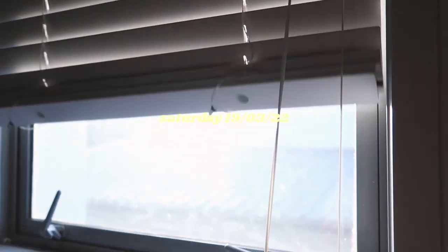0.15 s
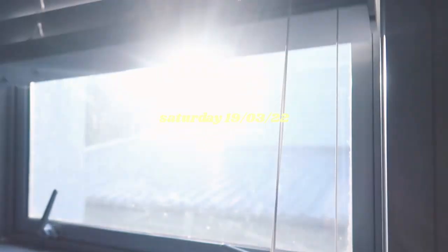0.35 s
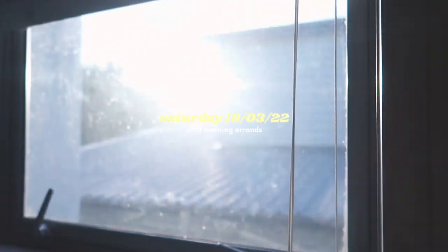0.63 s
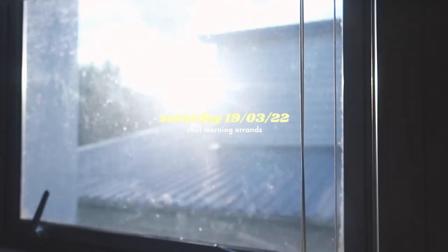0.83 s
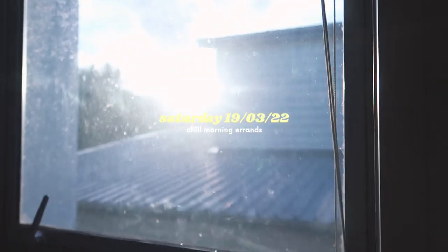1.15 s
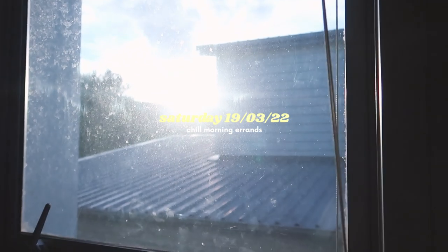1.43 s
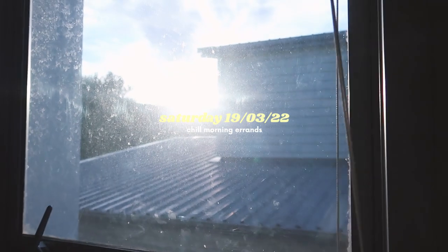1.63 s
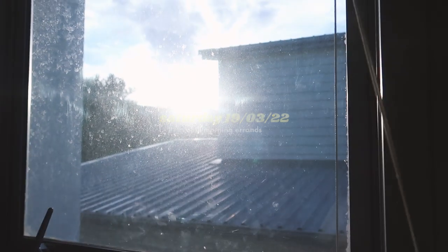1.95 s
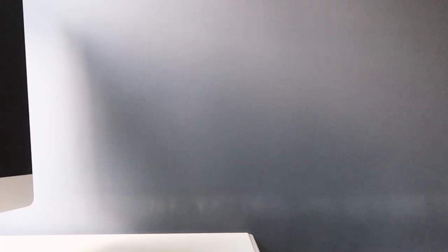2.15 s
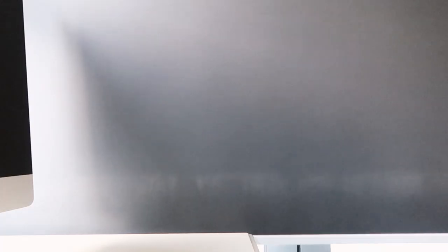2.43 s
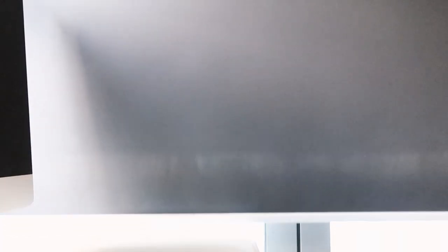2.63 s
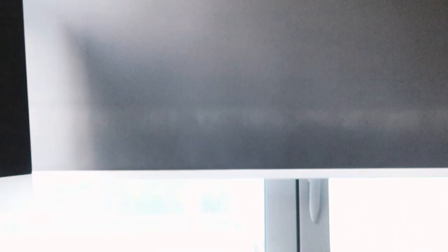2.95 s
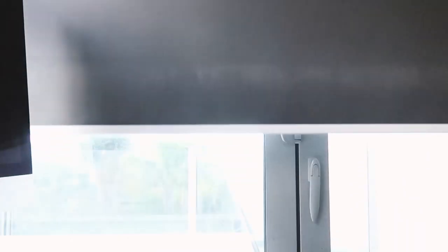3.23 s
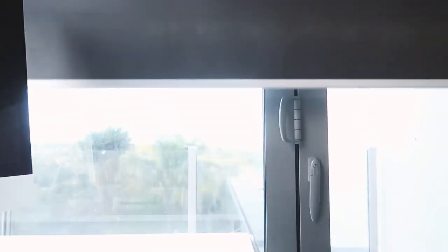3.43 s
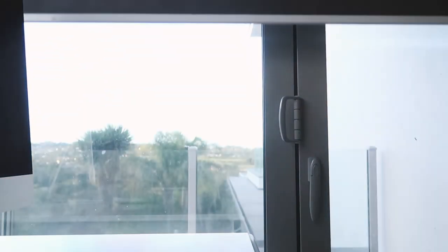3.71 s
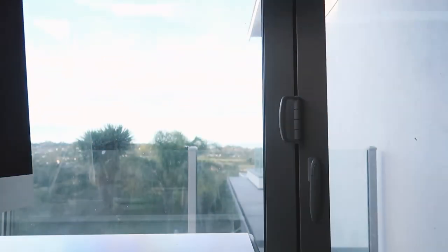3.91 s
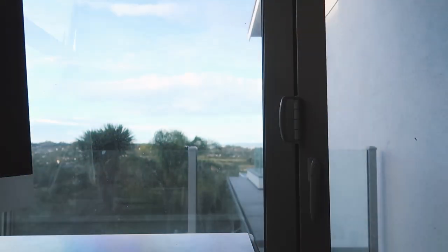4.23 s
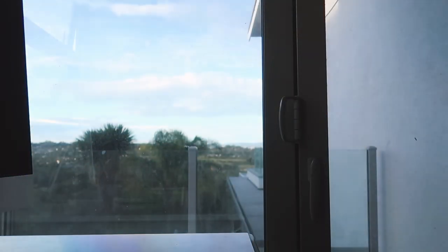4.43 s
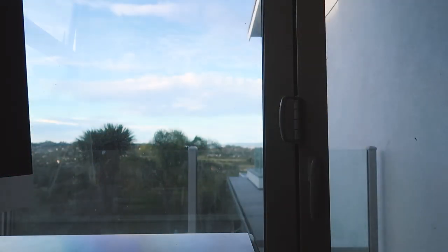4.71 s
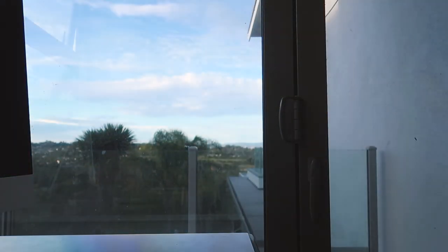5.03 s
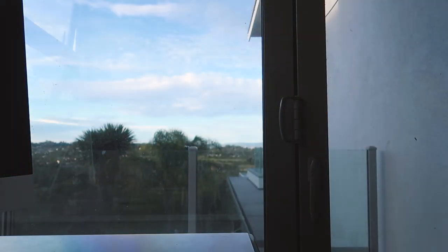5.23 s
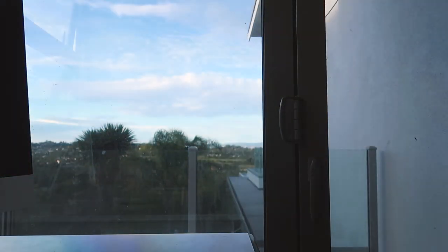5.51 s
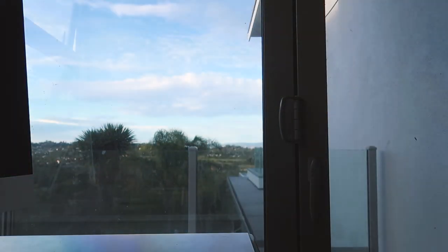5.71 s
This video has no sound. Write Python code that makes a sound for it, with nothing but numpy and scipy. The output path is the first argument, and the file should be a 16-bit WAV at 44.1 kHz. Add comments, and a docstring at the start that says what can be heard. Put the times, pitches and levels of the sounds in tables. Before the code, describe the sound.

A small quiet room, closely miked in stereo, with short dull reflections and faint hissy room tone. From 0 to 0.85 s a slatted blind is already being raised: the cord rasps through a ringing headrail, slats rustle, hard bright clicks come irregularly, strongest near 0.5 and 0.6 s, and small squeaks around 800-1500 Hz glide and waver. Weaker pulls follow until 1.4 s, ending in a rough squeaky scuff at 1.35 s. A near lull lasts until a faint squeak and rub around 1.95-2.1 s. Then a roller blind turns: bead chain chatters in uneven tugs, fabric swishes, and the tube rumbles low. A dull double knock lands at 2.5 s. From 3.2 to 5 s chatter is busier, with pitched bead snaps, quick rattles at 3.8 and 4.0 s, and strong tugs near 4.8 s. A sharp bar crack hits at 5.14 s, then softer knocks and chain ticks fade by 5.8 s.

```python
"""Small room, close to the microphones: two window blinds are raised in turn.
Slatted blind: fine cord catches ring the headrail, gliding tones squeak, noise bursts and modes click as slats.
Roller blind: a bead chain chatters through shifting resonances, fabric grains swish, the tube rumbles.
Its bottom bar knocks on the frame as struck modes; short reflections and room tone surround it all."""
import sys
import numpy as np
from scipy import signal
from scipy.fft import rfft, irfft
from scipy.io import wavfile
from scipy.ndimage import map_coordinates

SR = 44100
rng = np.random.default_rng(int(sys.argv[2]) if len(sys.argv) > 2 else 0)


def unload_audio(sound):
    """Save the sound as a 16-bit wav file, at the path given as the first command line argument."""
    columns = np.transpose(np.atleast_2d(sound))
    # keep every value between -1 and 1, then stretch to whole-number steps
    steps = np.round(np.clip(columns, -1, 1) * 32767)
    wavfile.write(sys.argv[1], SR, steps.astype(np.int16))


N = 258514
T = np.arange(N) / SR
BURST_T = T[:SR // 2]

# Slatted blind. Pulls on the cord [start t/s, swell/s, length/s, cord gain/dB, slat gain/dB]
CORD_PULLS = [(0.0, 0.00074, 0.85, -33.5, -33.5), (0.852, 0.044, 0.28, -44.5, -41),
              (1.141, 0.036, 0.23, -41.5, -39.5), (1.973, 0.12, 0.11, -41, -47.5)]
# Headrail resonances [f/Hz, width/Hz, relative gain/dB]
HEADRAIL_MODES = [(187, 29, -10), (310, 18, -14.5), (392, 32, -6.5), (806, 19, 3.5), (876, 82, 6),
                  (1001, 61, 4.5), (1470, 400, -5.5), (2260, 240, 3)]
# Cord squeaks [t/s, length/s, start f/Hz, end f/Hz, level/dB, pitch waver as share of f]
SQUEAKS = [(0.02, 0.19, 829, 779, -37.5, 0), (0.236, 0.041, 1002, 1156, -29, 0.09),
           (0.359, 0.035, 1084, 1420, -33.5, 0), (0.486, 0.038, 1265, 1337, -32.5, 0.14),
           (0.619, 0.035, 1382, 1298, -31, 0.07), (0.757, 0.033, 1142, 1534, -27, 0.06),
           (0.914, 0.041, 1420, 1170, -30, 0.16), (1.128, 0.032, 1734, 1790, -39, 0.01),
           (1.341, 0.016, 2440, 2290, -31.5, 0.14), (1.349, 0.028, 1480, 1330, -28.5, 0.09),
           (1.356, 0.028, 1020, 800, -22.5, 0.19), (1.388, 0.0226, 872, 776, -24, 0.1),
           (1.401, 0.0745, 2425, 2245, -41, 0), (1.943, 0.19, 938, 897, -44, 0.1)]
# Slats scuffing past each other [t/s, length/s, level/dB, centre f/Hz]
SCUFFS = [(1.19, 0.072, -38.5, 438), (1.348, 0.092, -33.5, 1150), (2.119, 0.011, -31.5, 3980),
          (2.12, 0.015, -28.5, 1090)]
# Slat clicks [t/s, peak level/dB, treble tilt/dB, ring against crack/dB]
SLAT_CLICKS = [(.008, -14.5, 3, -18), (0.034, -14, 39, -14), (0.04, -12.5, 22, -18), (0.054, -20, 10, -8),
               (0.118, -18.5, 44, -16), (0.216, -21.5, 7, -14), (0.257, -15, 6, -11),
               (0.332, -18.5, -1, -6), (0.46, -19, 6, -14), (.476, -8.5, -8.5, -21), (0.568, -25, -3, -12),
               (.603, -8.5, -8, 0.5), (0.678, -24.5, 0, -17), (0.7, -19, -5, -19), (1.023, -19, 0, -15),
               (1.405, -20, -10, -15)]
# Modes of one slat [f/Hz, relative level/dB, t60/s]
SLAT_MODES = [(1365, 15, 0.033), (2664, 31, 0.023), (3346, 17.5, 0.052), (3990, 18.5, 0.047),
              (8600, 16, 0.05), (12230, -19, 0.048)]
# Slat spectrum [f/Hz, gain/dB]
SLAT_COLOUR = [(300, -30), (1200, 0.5), (1800, 1), (2900, 3.5), (4500, -2), (6700, -3.5), (9000, -18),
               (12000, -19.5), (16000, -35)]

# Roller blind. Slow turns of the roller [start t/s, length/s, chain gain/dB]
SLOW_TURNS = [(2.107, 0.898, -43.5), (3.07, 1.82, -42.5), (5.17, 0.6, -48)]
# Tugs on the bead chain [start t/s, length/s, chain gain/dB]
CHAIN_TUGS = [(2.097, 0.074, -36.5), (2.235, 0.32, -36.5), (2.747, 0.14, -41.5), (3.34, 0.15, -34),
              (3.51, 0.077, -27.5), (3.69, 0.18, -33), (3.937, 0.15, -32.5), (4.198, 0.082, -34),
              (4.378, 0.23, -41), (4.757, 0.048, -28.5), (4.81, 0.12, -26.5), (5.228, 0.12, -35),
              (5.386, 0.074, -30), (5.562, 0.041, -38)]
# Loose fabric sweeping over the frame [start t/s, swell/s, length/s, fabric gain/dB]
FABRIC_SWEEPS = [(2.287, 0.13, 0.15, -33.5), (3.498, 0.074, 0.082, -28), (3.715, 0.063, 0.18, -37),
                 (3.967, 0.03, 0.089, -38.5), (4.653, 0.006, 0.028, -23.5), (4.785, 0.026, 0.13, -35.5),
                 (5.393, 0.0055, 0.023, -36.5)]
# Beads snapping over the wheel [t/s, peak level/dB, treble tilt/dB, clack f/Hz]
BEAD_SNAPS = [(2.654, -24.5, 12, 1500), (2.775, -23.5, 11, 593), (3.028, -34, -3, 2690),
              (3.213, -25, -38, 520), (3.248, -20.5, -18, 860), (3.257, -21.5, -42, 633),
              (3.391, -18.5, -9, 1120), (3.42, -23, -11, 1130), (3.527, -22, 28, 4830),
              (3.596, -15, -21, 820), (3.774, -22, 14, 3480), (3.845, -23, 5, 950),
              (3.948, -23.5, 37, 5300), (4.03, -21, 11, 1430), (4.097, -18.5, 15, 930),
              (4.245, -20.5, -24, 610), (4.277, -19, -2, 510), (4.428, -24, -42, 550),
              (4.659, -17, -1, 4500), (4.769, -18, 9, 1050), (4.9684, -16, 0, 2910), (5.284, -27, 7, 3030),
              (5.399, -23, 40, 3860)]
# Bright runs of the chain over its bracket [t/s, length/s, level/dB, centre f/Hz]
CHAIN_RATTLES = [(3.772, 0.095, -37, 3700), (3.995, 0.095, -41, 3970)]
# Spectra of chain, bead snap, fabric and tube rumble [f/Hz, gain/dB]
CHAIN_COLOUR = [(100, -11.5), (300, 1.5), (480, 4.5), (1000, 1.5), (1450, -1), (1900, -6.5), (2800, -4.5),
                (3600, -15), (7500, -27), (13000, -52)]
BEAD_COLOUR = [(100, -8.5), (450, 13), (1100, 6), (3000, 3), (6000, -12), (9500, -30), (16000, -92)]
FABRIC_COLOUR = [(400, -8.5), (1500, 0), (3700, 2), (5000, 1), (7000, -8), (9500, -13), (11200, -35),
                 (16000, -100)]
RUMBLE_COLOUR = [(20, -47), (52, 12), (95, 10.5), (135, 7.5), (210, 5.5), (500, -22), (4000, -92)]

# Bottom bar on frame [t/s, blow gain/dB, contact time/s, bar ring/dB, sash thud gain/dB]
KNOCKS = [(2.515, -20, 0.00015, -11, -26), (2.5185, -26, 0.00057, -3.5, -19),
          (5.138, -14.5, 0.000041, -1.5, -36), (5.246, -36, 0.00063, -6, -33.5),
          (5.419, -28, 0.00013, -6.5, -34.5), (5.586, -34.5, 0.00013, -3.5, -39),
          (5.628, -34.5, 0.00025, -1, -47), (5.742, -40, 0.00046, -2, -41.5)]
# Modes of bar and frame, heavy modes of the sash [f/Hz, relative level/dB, t60/s]
BAR_MODES = [(137.7, -4, 0.24), (207, -6.5, 0.18), (368.6, -1, 0.18), (422, -1.5, 0.1), (555, 1.5, 0.038),
             (648, -2, 0.096), (800, -3, 0.051), (945, 0, 0.034), (1460, -21, 0.07), (2110, 6.5, 0.02)]
SASH_MODES = [(75.3, -7.5, 0.3), (135.6, 2, 0.36), (208.5, -1.5, 0.15), (279, -0.5, 0.059),
              (342, -1.5, 0.086), (417, -8, 0.064)]
# Spectrum of the frame crack [f/Hz, gain/dB]
FRAME_COLOUR = [(70, -11), (200, 2.5), (500, -2), (900, -1.5), (1900, -4), (2800, -9), (8000, -28),
                (16000, -83)]

# Reflections that differ between the two microphone ports [f/Hz, gain/dB]
WIDTH = [(100, -48), (500, -57), (1200, -13.5), (2500, -10.5), (4200, 0.5), (8000, 6), (14000, -11.5)]
# Microphone pair balance [f/Hz, left minus right/dB]
LEAN = [(100, -1), (1400, 1.34), (8000, 0.6)]
# Room tone spectrum [f/Hz, gain/dB]
AIR_COLOUR = [(25, -5), (52, 4), (105, 5.5), (400, -4.5), (1240, -11), (7000, -25.5), (11000, -33.5),
              (15000, -47)]

HEADRAIL_DRIFT = 0.028  # share by which the resonances wander as the cord shifts
CORD_EASE_DB_PER_S, CORD_RELEASE_DB_PER_S = 9.5, 218  # eases as the slats stack up, then lets go
TUG_ATTACK_S, TUG_EASE_DB_PER_S, TUG_RELEASE_DB_PER_S = 0.037, 1.5, 203
SWEEP_RELEASE_DB_PER_S = 139
SLOW_FABRIC_VS_CHAIN_DB, TUG_FABRIC_VS_CHAIN_DB = -13, -14  # control gains
AIR_DB = -52
TOP_HZ = 15800


def undb(db):
    """Decibels to gain."""
    return 10 ** (np.asarray(db) / 20)


def unit(x):
    """Scale to rms 1."""
    return x / np.sqrt(np.mean(x ** 2))


def peak(x):
    """Scale to peak 1."""
    return x / np.max(np.abs(x))


def add(out, t_s, x):
    """Mix x into out at t_s."""
    i = max(int(t_s * SR), 0)
    out[i:i + len(x)] += x[:N - i]


def colour(x, points):
    """Minimum-phase filter through [f/Hz, gain/dB] points, built by folding the cepstrum."""
    size = 8192
    hz, db = np.transpose(points)
    f_hz = np.maximum(np.fft.rfftfreq(size, 1 / SR), 1)
    gain_db = np.interp(np.log(f_hz), np.log(hz), db)
    cepstrum = irfft(np.log(undb(gain_db)))
    cepstrum[1:size // 2] *= 2
    cepstrum[size // 2 + 1:] = 0
    response = irfft(np.exp(rfft(cepstrum)))
    return signal.fftconvolve(x, response)[:len(x)]


def brighten(x, db):
    """Treble tilt: a harder contact is brighter, a softer one (negative dB) duller."""
    return colour(x, [(1500, 0.0018), (12000, db)])


def resonate(x, hz, width_hz):
    """One resonance, gain 1 at its centre."""
    return signal.lfilter(*signal.iirpeak(hz, hz / width_hz, fs=SR), x)


def reflect(x, response):
    """Pass x through a set of reflections of unit energy."""
    return signal.fftconvolve(x, response / np.sqrt(np.sum(response ** 2)))[:N]


def walk(knots_per_s, size=N):
    """Random wander about 0, straight lines between Gaussian knots."""
    knots = rng.standard_normal(4096)
    return 0.884 * np.interp(T[:size] * knots_per_s, np.arange(len(knots)), knots)


def fade(t60_s):
    """Half a second of exponential decay."""
    return np.exp(-np.log(1000) * BURST_T / t60_s)


def burst(t60_s):
    """Decaying noise: many crowded modes."""
    return rng.standard_normal(SR // 2) * fade(t60_s)


def ring(modes, detune=0.014):
    """Struck modes, a little different at each blow."""
    chance = rng.standard_normal(len(modes))
    out = np.zeros(SR // 2)
    for k, (hz, db, t60_s) in enumerate(modes):
        blow_hz = hz * (1 + detune * chance[k])
        out += (-1) ** k * undb(db) * fade(t60_s) * np.sin(2 * np.pi * blow_hz * BURST_T)
    return out


def contacts(rate_per_s, spread_db):
    """Tiny impacts of either sign at random moments, a few far from the usual strength."""
    strength = undb(spread_db * np.minimum(rng.exponential(size=N), 4))
    return (rng.random(N) < rate_per_s / SR) * rng.choice([-1, 1], N) * strength


def stroke(start_s, length_s, attack_s, release_db_per_s, slope_db_per_s=0):
    """Gain of one movement: it rises, holds on a slope and dies away."""
    age_s = T - start_s
    db = slope_db_per_s * np.clip(age_s, 0, length_s)
    db = db - release_db_per_s * np.maximum(age_s - length_s, 0)
    return np.clip(age_s / attack_s, 0, 1) * undb(db)


def together(gains):
    """Overlapping movements add in power."""
    return np.sqrt(sum(g ** 2 for g in gains))


def slatted_blind():
    """Each pull runs the cord through the headrail and lifts the slats; the first is already under way."""
    pulls = [(stroke(s, length_s, swell_s, CORD_RELEASE_DB_PER_S, -CORD_EASE_DB_PER_S), cord_db, slat_db)
             for s, swell_s, length_s, cord_db, slat_db in CORD_PULLS]
    cord_gain = together(pull * undb(db) for pull, db, _ in pulls)
    slat_gain = together(pull * undb(db) for pull, _, db in pulls)
    return cord(cord_gain) + squeaks() + scuffs() + slats(slat_gain)


def cord(gain):
    """The running cord catches finely on the lock and rings the headrail."""
    slips = contacts(rate_per_s=3000, spread_db=2.5) * undb(walk(44.73))
    rail = sum(undb(db) * resonate(slips, hz, width_hz) for hz, width_hz, db in HEADRAIL_MODES)
    # the headrail's resonances wander as the cord shifts
    read_at = np.cumsum(1 + HEADRAIL_DRIFT * walk(14))
    rail = map_coordinates(rail, [read_at], mode="mirror")
    rasp = colour(rail, [(60, -35.0), (200, 8.5), (2800, -6.5), (6000, -11.0)])
    return gain * undb(4.5) * unit(rasp)


def squeaks(flutter_db=3.5, overtone_db=-15, rasp_db=-13):
    """Brief stick-slip tones of the cord with gliding pitch, some steady and some wavering."""
    out = np.zeros(N)
    for s, length_s, start_hz, end_hz, db, waver in SQUEAKS:
        n = int(length_s * SR)
        hz = np.geomspace(start_hz, end_hz, n) * (1 + waver * walk(567.0, size=n))
        phase = 2 * np.pi * np.cumsum(hz) / SR
        tone = np.sin(phase) * (1 + undb(rasp_db) * walk(3000, size=n))
        tone = tone + undb(overtone_db) * np.sin(2 * phase)
        envelope = signal.windows.tukey(n, .5) * undb(flutter_db * walk(361.0, size=n))
        add(out, s, undb(db) * unit(tone * envelope))
    return out


def scuffs():
    """Slat on slat: short bursts of dense catches in one broad band."""
    out = np.zeros(N)
    for s, length_s, db, hz in SCUFFS:
        n = int(length_s * SR)
        rub = rng.standard_normal(n) * undb(1.3 * walk(336, size=n)) * signal.windows.tukey(n, .5)
        band_hz = [hz / 2, min(hz * 2, SR / 2.5)]
        rub = signal.sosfilt(signal.butter(2, band_hz, "band", fs=SR, output="sos"), rub)
        add(out, s, undb(db) * unit(rub))
    return out


def slats(gain):
    """Slats rustle and tick as they stack up, and some click sharply together."""
    rustle = contacts(rate_per_s=1100, spread_db=-2.0) * undb(2.4 * walk(69.64))
    ticks = reflect(contacts(rate_per_s=67, spread_db=2.2), burst(0.018))
    rustle, ticks = unit(colour(rustle, SLAT_COLOUR)), unit(colour(ticks, SLAT_COLOUR))
    out = gain * (undb(-4.0) * rustle + undb(-9) * ticks)
    for s, db, tilt_db, ring_db in SLAT_CLICKS:
        crack = colour(burst(0.004) + undb(-8) * burst(0.039), SLAT_COLOUR)
        click = undb(ring_db) * peak(ring(SLAT_MODES, detune=0.019)) + peak(crack)
        add(out, s, undb(db) * peak(brighten(click, tilt_db)))
    return out


def roller_blind():
    """Tugs on the chain stand out from the slow turning; the fabric follows and at times sweeps the frame."""
    slow = together(undb(db) * stroke(s, length_s, TUG_ATTACK_S, TUG_RELEASE_DB_PER_S)
                    for s, length_s, db in SLOW_TURNS)
    tugs = together(undb(db) * stroke(s, length_s, TUG_ATTACK_S, TUG_RELEASE_DB_PER_S, -TUG_EASE_DB_PER_S)
                    for s, length_s, db in CHAIN_TUGS)
    sweeps = together(undb(db) * stroke(s, length_s, swell_s, SWEEP_RELEASE_DB_PER_S)
                      for s, swell_s, length_s, db in FABRIC_SWEEPS)
    chain_gain = together([slow, tugs])
    fabric_gain = together([undb(SLOW_FABRIC_VS_CHAIN_DB) * slow, undb(TUG_FABRIC_VS_CHAIN_DB) * tugs, sweeps])
    # the roller sticks and slips, so chain and fabric crackle in the same short bursts
    judder = undb(2.2 * walk(110) - .5)
    return chain(chain_gain * judder) + rattles() + roller(fabric_gain * judder, slow)


def chain(gain, shift_db=3.0, clack_db=-4, clack_t60_s=0.034):
    """Beads chatter in the plastic wheel housing; some snap over a tooth with a short pitched clack."""
    chatter = contacts(rate_per_s=1300, spread_db=2.0)
    chatter = chatter + undb(9.5) * contacts(rate_per_s=45, spread_db=1.5)
    # the beads strike in ever new places, so the housing's resonances take turns
    housing = np.zeros(N)
    for k, hz in enumerate(np.geomspace(200, 9000, num=22)):
        housing += (-1) ** k * resonate(chatter, hz, hz / 6) * undb(shift_db * walk(55))
    out = gain * undb(-2) * unit(colour(housing, CHAIN_COLOUR))
    for s, db, tilt_db, hz in BEAD_SNAPS:
        snap = colour(burst(0.013) + undb(-7.5) * burst(0.11), BEAD_COLOUR)
        snap = peak(brighten(snap, tilt_db))
        clack = ring([(hz, clack_db, clack_t60_s)])
        add(out, s, undb(db) * peak(snap + clack))
    return out


def rattles(beads_per_s=230):
    """A quick, uneven string of beads ticks on the bracket, each at a slightly different pitch."""
    out = np.zeros(N)
    for s, length_s, db, hz in CHAIN_RATTLES:
        run = np.zeros(N)
        beads = rng.standard_normal((int(length_s * beads_per_s) + 1, 3))
        for k, (late, size, pitch) in enumerate(beads):
            tick_hz = hz * 2 ** (pitch / 10)
            tick = resonate(resonate(burst(0.017), tick_hz, hz / 2), tick_hz, hz / 2)
            add(run, s + (k + late / 2) / beads_per_s, undb(2 * size) * unit(tick))
        # rms level holds over the length of the run
        out += undb(db) * unit(run) * np.sqrt(length_s * SR / N)
    return out


def roller(fabric_gain, turning_gain):
    """Stiff fabric scuffs and crinkles onto the tube, which rumbles in its brackets as it turns."""
    grains = contacts(rate_per_s=2200, spread_db=-1.0)
    grains = grains + undb(6.5) * contacts(rate_per_s=160, spread_db=-2.5)
    swish = unit(colour(grains, FABRIC_COLOUR))
    rumble = unit(colour(rng.standard_normal(N), RUMBLE_COLOUR) * undb(4.3 * walk(24.008)))
    return undb(-2.5) * fabric_gain * swish + undb(-35.0) * turning_gain ** 0.25 * rumble


def knocks(crack_db=-18, tail_db=-9):
    """The bar cracks on the frame and shakes the sash; a longer contact low-passes the blow."""
    out = np.zeros(N)
    for s, db, contact_s, ring_db, thud_db in KNOCKS:
        crack = colour(burst(0.029) + undb(tail_db) * burst(0.25), FRAME_COLOUR)
        blow = undb(ring_db) * ring(BAR_MODES, detune=0.0018) + undb(crack_db) * unit(crack)
        soft = np.exp(-np.pi / (contact_s * SR))
        blow = signal.lfilter([1 - soft], [1, -soft], blow)
        body = unit(resonate(resonate(burst(0.13), 228, 220), 228, 220))
        thud = ring(SASH_MODES, detune=0.0031) + undb(-17) * body
        add(out, s, undb(db) * blow + undb(thud_db) * thud)
    return out


def room(x, t60_s, wet_db):
    """Close walls add a short, dull tail, alike at both ports in the bass and different in the treble."""
    swell = np.clip(BURST_T / 0.0045, 0, 1) ** 2
    tail = reflect(x, burst(t60_s) * swell)
    tail = colour(tail, [(120, -2.5), (400, 1.0), (2500, 0.0), (7000, -3.5), (13000, -7.5)])
    mid = x + undb(wet_db) * tail
    # contacts are spread across the blind's width, so their reflections keep changing side
    side = colour(reflect(mid, burst(0.064)) * walk(120), WIDTH)
    left = colour(mid + side, [(hz, db / 2) for hz, db in LEAN])
    right = colour(mid - side, [(hz, -db / 2) for hz, db in LEAN])
    # the sound reaches the right port one sample later
    return np.array([left, np.append(0, right[:-1])])


def air():
    """Quiet room tone with microphone hiss: coloured noise, wider in the treble, its level wandering."""
    mid, side = (unit(colour(rng.standard_normal(N), AIR_COLOUR)) for _ in range(2))
    side = colour(side, [(100, -20.0), (500, -3.0), (3000, 4.5)])
    return undb(AIR_DB + 1.3 * walk(2.46)) * np.array([mid + side, mid - side])


def scene():
    """Both blinds in turn and the bar's knocks, each in the room, over the room tone."""
    slatted = room(slatted_blind(), t60_s=0.37, wet_db=-7.0)
    rolled = room(roller_blind(), t60_s=0.48, wet_db=-6.0)
    knocked = room(knocks(), t60_s=0.33, wet_db=-7.0)
    return slatted + rolled + knocked + air()


def record(dry):
    """A steep low-pass cuts the top of the treble."""
    return signal.sosfilt(signal.ellip(8, .2, 80, TOP_HZ, fs=SR, output="sos"), dry)


dry = scene()
out = record(dry)
unload_audio(out)
```